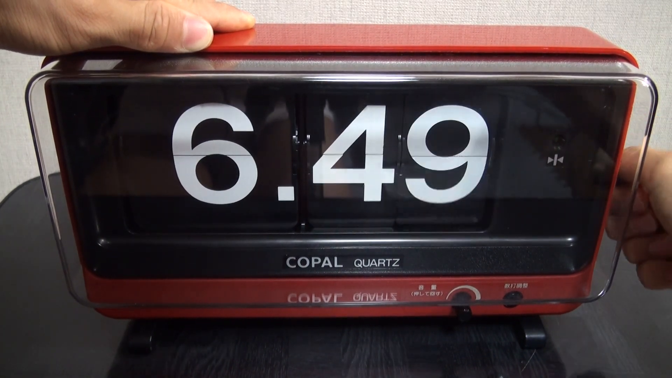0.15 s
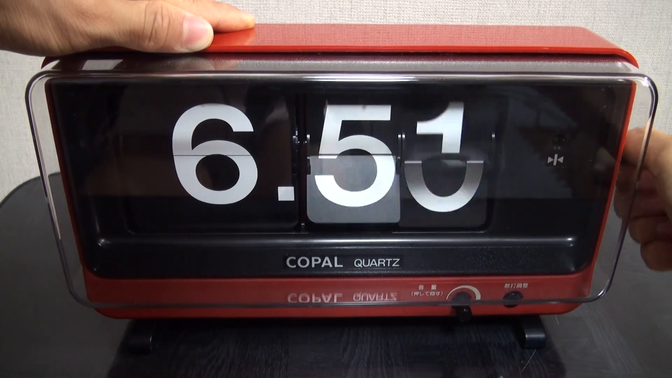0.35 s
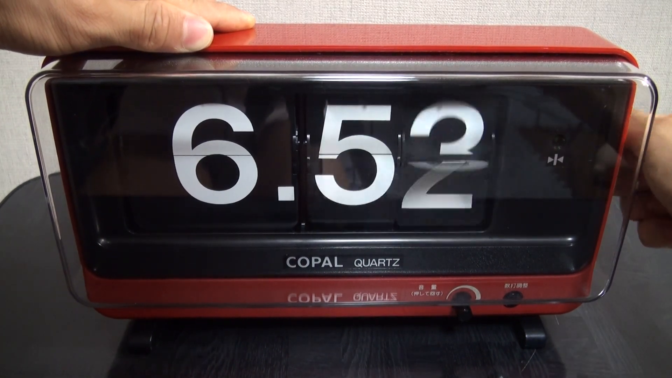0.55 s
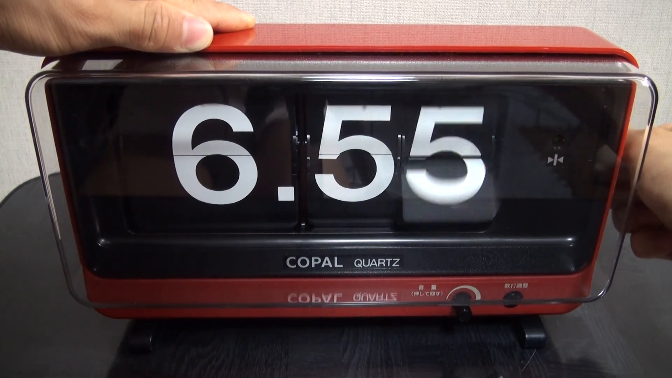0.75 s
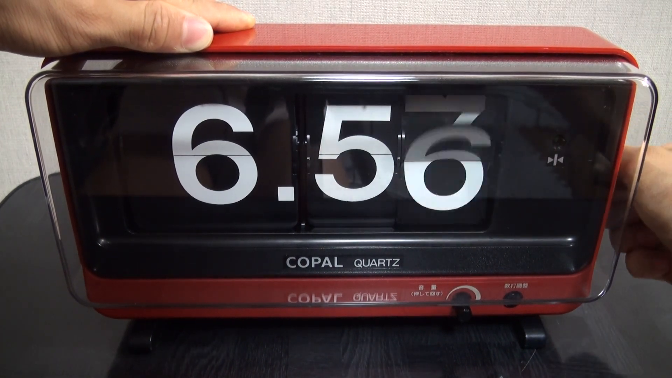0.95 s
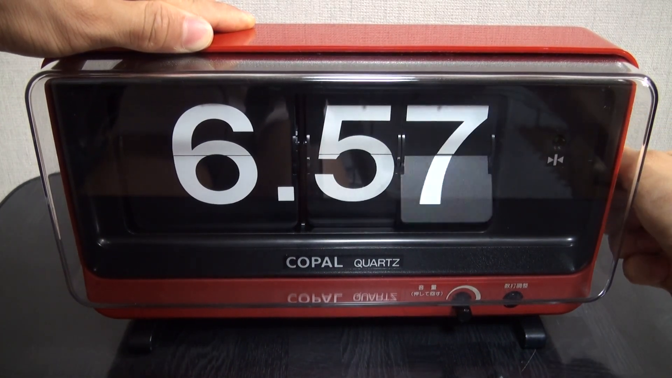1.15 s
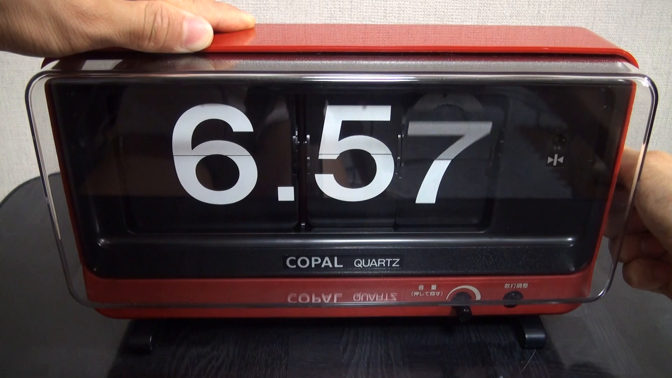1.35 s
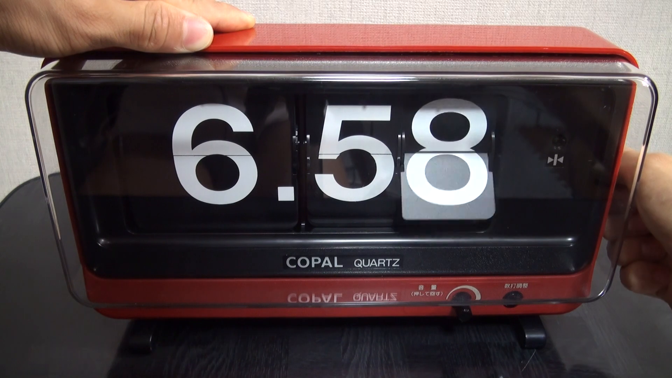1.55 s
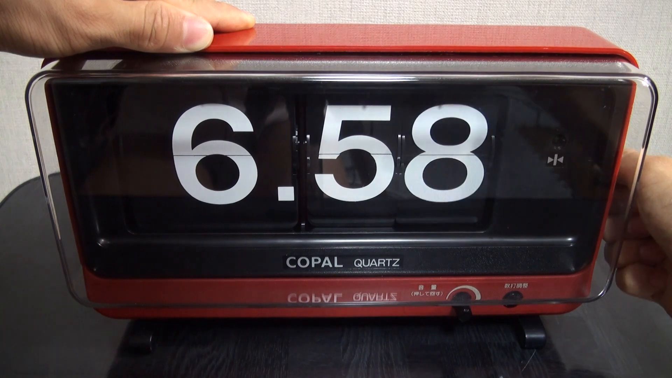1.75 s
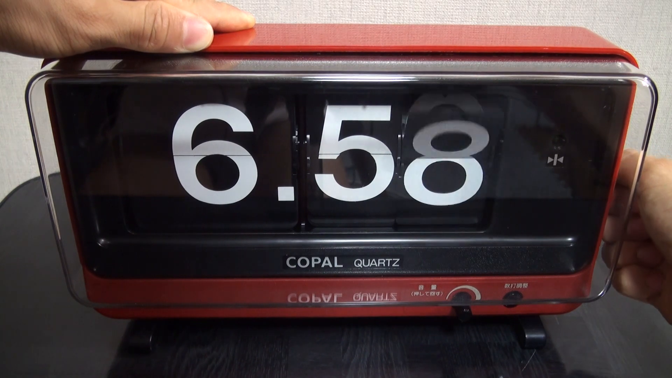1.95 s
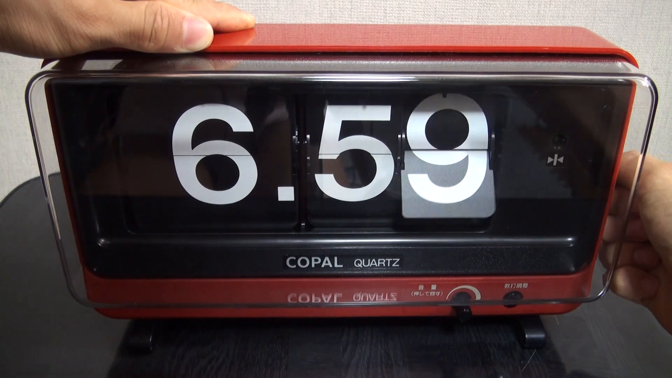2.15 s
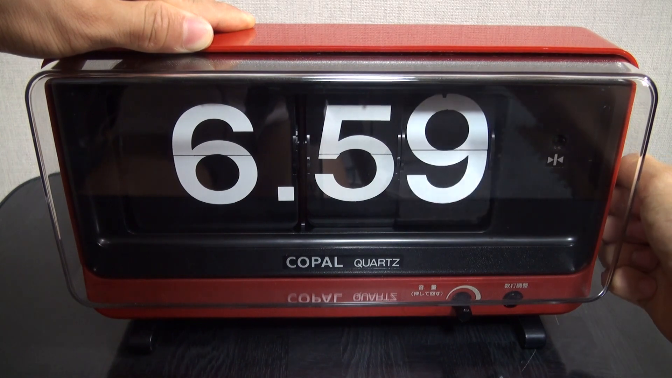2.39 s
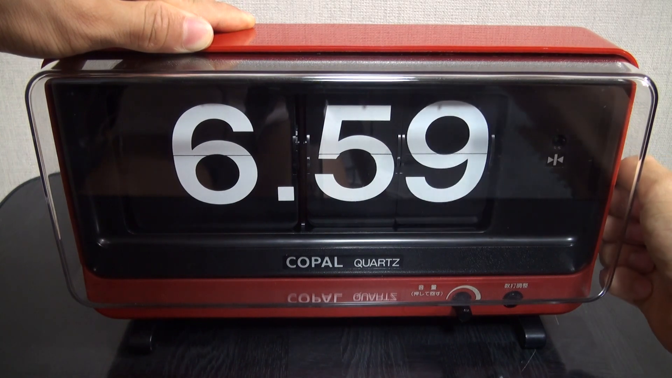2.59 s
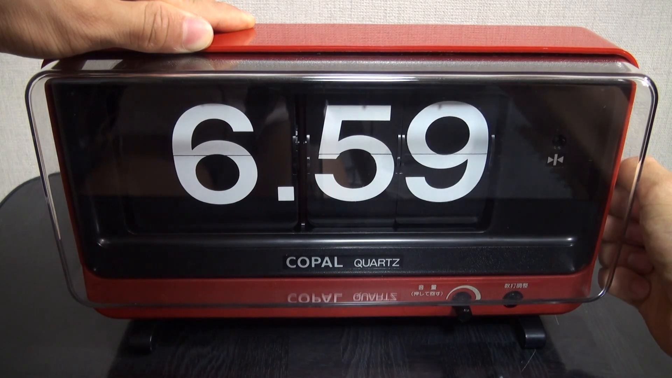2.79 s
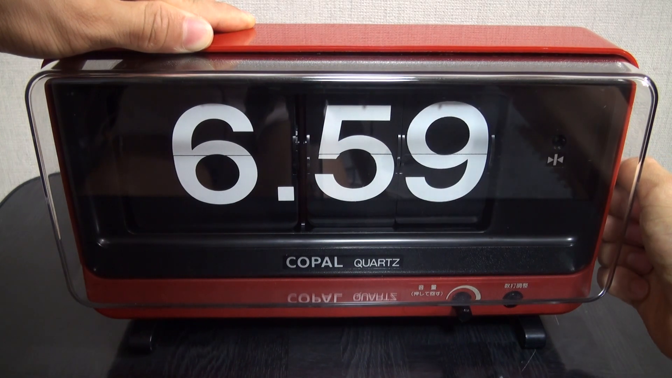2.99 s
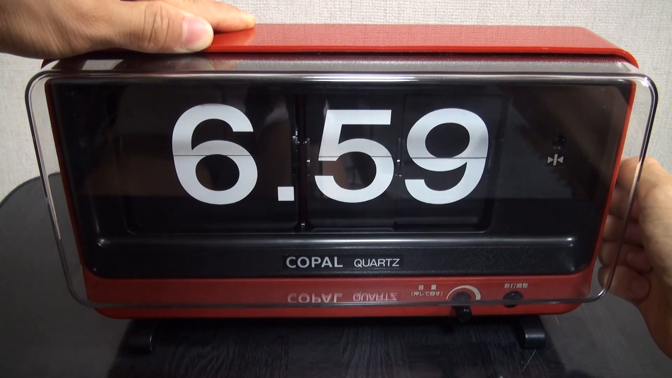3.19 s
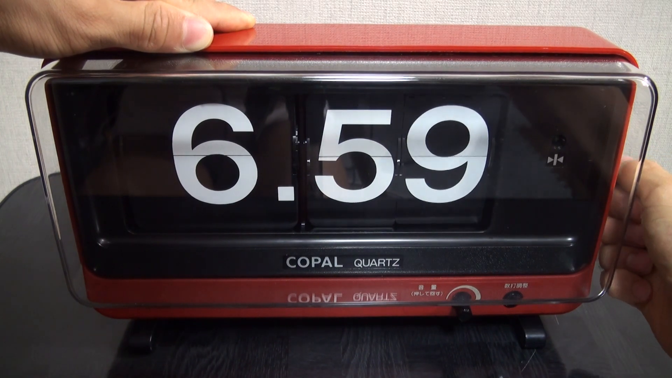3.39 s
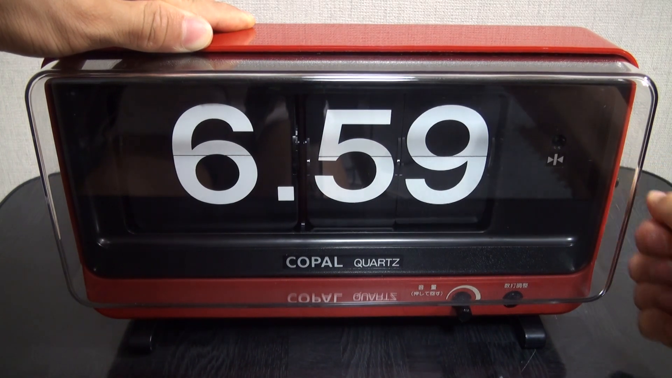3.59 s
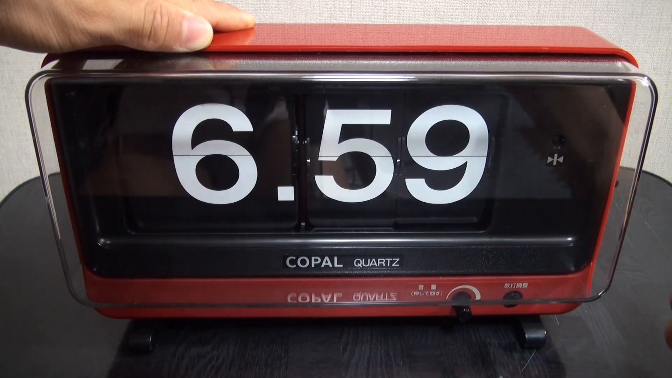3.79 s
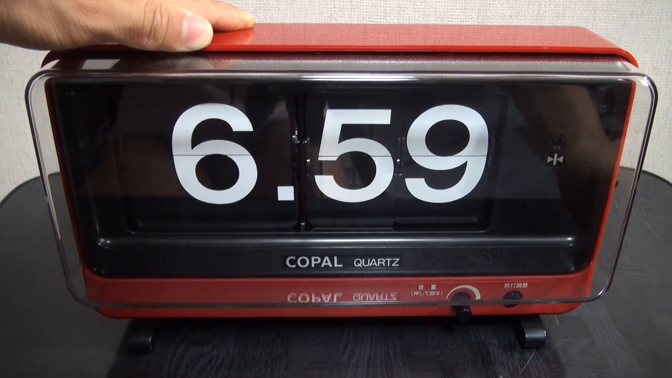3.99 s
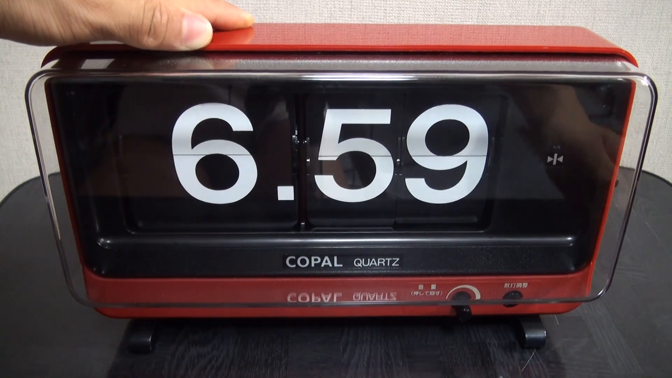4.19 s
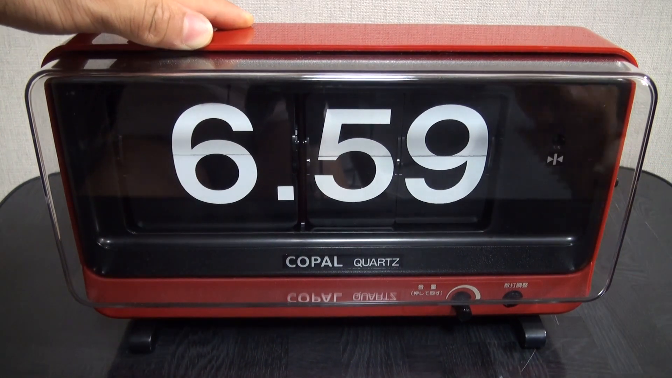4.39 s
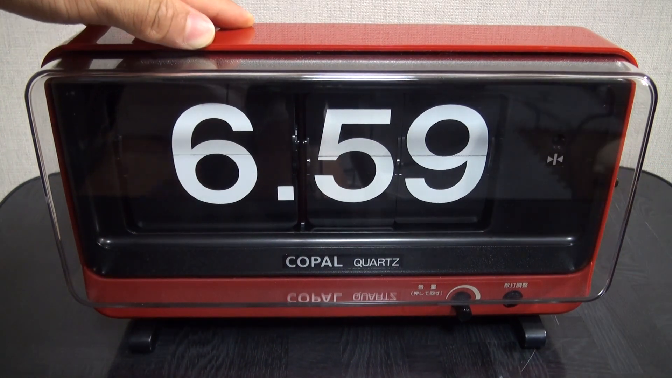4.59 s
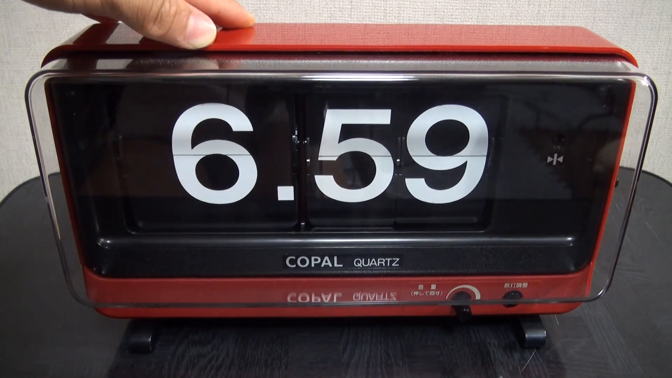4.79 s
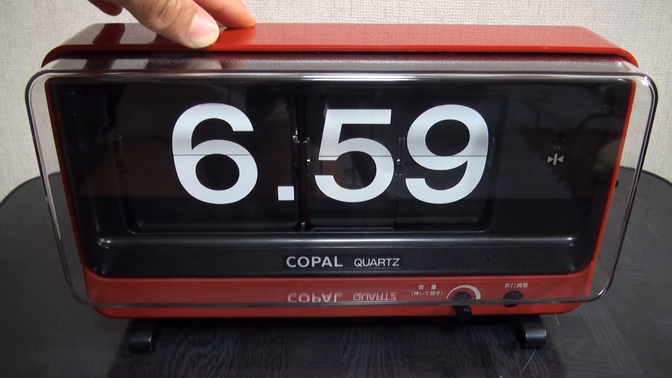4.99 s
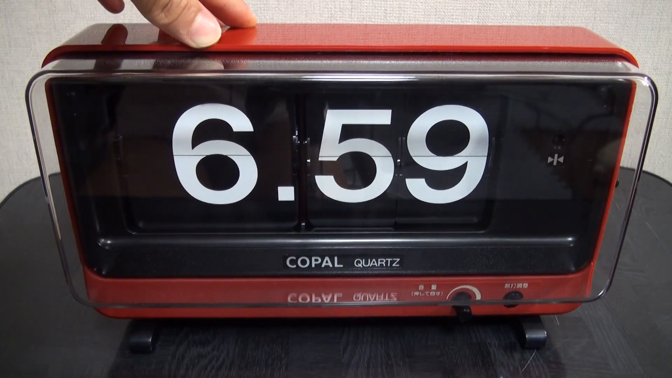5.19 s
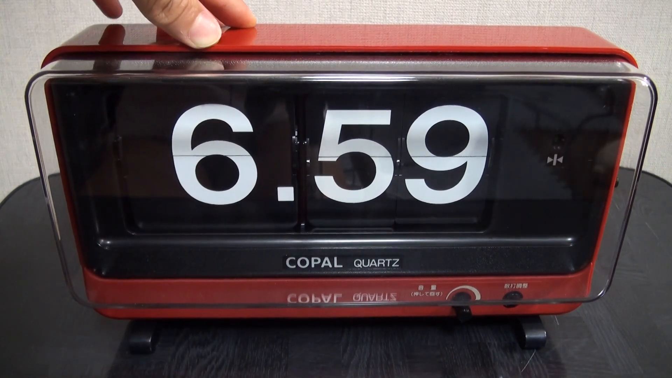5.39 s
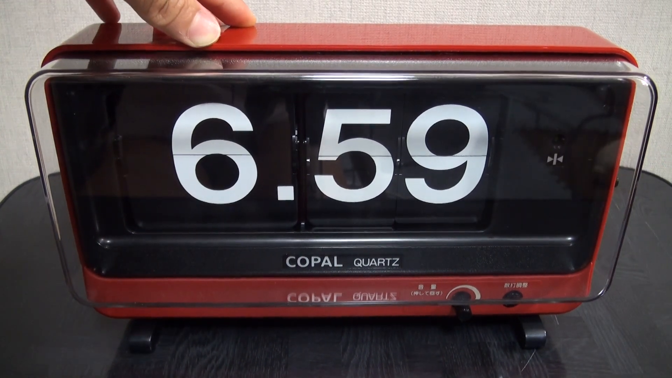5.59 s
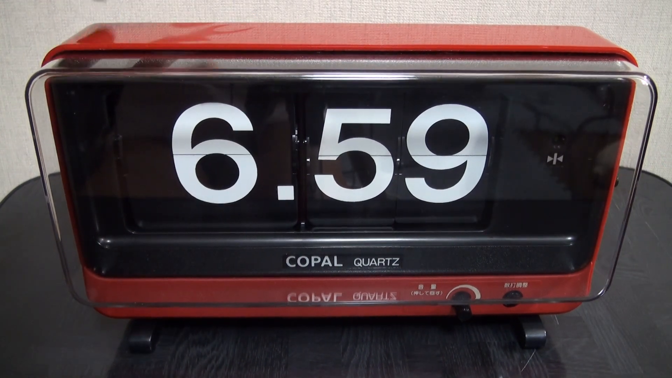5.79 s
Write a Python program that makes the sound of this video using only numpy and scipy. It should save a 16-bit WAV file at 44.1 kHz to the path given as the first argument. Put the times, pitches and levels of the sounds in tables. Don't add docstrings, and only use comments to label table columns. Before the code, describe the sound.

Flip clock cards snap and slap in a fast bright plastic clatter, slow to single flips, then soft finger knocks in a quiet room.

```python
import sys
import numpy as np
from scipy import signal
from scipy.io import wavfile

SR = 44100
rng = np.random.default_rng(int(sys.argv[2]) if len(sys.argv) > 2 else 0)


def put_to_file(sound):
    columns = np.atleast_2d(sound).T
    safe = np.clip(columns, -1, 1)
    whole_steps = np.round(safe * 32767)
    wavfile.write(sys.argv[1], SR, whole_steps.astype(np.int16))


def voltage_ratio(decibels):
    exponent = np.asarray(decibels, float) / 20
    return 10 ** exponent


N = 257965
LEFT_RIGHT = np.array([[1], [-1]])


def contacts():
    # start_s, peak_db, panel_rel_db, case_db, rattle_ms
    snap_events = [(0.0004, -13, -14.5, -35.5, 5.6), (0.2059, -10, -12.5, -31.5, 8.3),
                   (0.3155, -9.5, -14.5, -33, 6.7), (0.418, -14, -10, -33.5, 8.4),
                   (0.519, -10.5, -12, -33.5, 5.5), (0.607, -8.5, -9.5, -37.5, 4.6),
                   (0.6943, -6, -11.5, -36, 4.4), (0.8001, -16.5, -10, -37, 9.4),
                   (0.9383, -8.5, -15.5, -37, 5.8), (1.267, -9.5, -12.5, -34.5, 6.4),
                   (1.8142, -8.5, -11.5, -34, 5.55), (3.1681, -6, -15.5, -34, 4.6)]
    # start_s, peak_db, panel_rel_db, rattle_ms
    slap_events = [(0.0408, -9, -22.5, 2.9), (0.0455, -13.5, -11.5, 3.6), (0.352, -11.5, -9, 2.2),
                   (0.357, -11.5, -18, 3.1), (0.4606, -11, -9.5, 2.2), (0.4644, -7.5, -17, 2.26),
                   (0.5595, -12.5, -13, 4.3), (0.565, -12.5, -21, 3.9), (0.6588, -11, -10, 4.2),
                   (0.727, -15.5, -15, 4.2), (0.738, -9.5, -14.5, 3.3), (0.834, -9, -13.5, 3.4),
                   (0.8999, -23, -9, 2.9), (0.9287, -10, -10, 1.9), (1.246, -20.5, -10.5, 2.5)]
    # start_s, peak_db, panel_rel_db
    tick_events = [
        (1.06, -33.5, -3.5),
        (1.108, -34.5, 3.5),
        (1.1554, -43, -12),
        (1.526, -43, -10),
        (3.939, -41, -4),
        (5.732, -28, 1),
        (5.7526, -25.5, -17),
        (5.766, -26.5, -2),
    ]
    # start_s, peak_db, panel_rel_db, case_rel_db
    knock_events = [(1.1406, -35.5, -1.5, -4.5), (1.2135, -47, -1, -3), (1.3874, -38, -3, -13),
                    (1.511, -43, -16, -8), (1.6573, -39.5, -5, -9), (1.803, -29, -13, -15),
                    (2.079, -42.5, 0, -7), (2.1082, -43.5, -12, 8.5), (2.1394, -46, 11, -19),
                    (2.248, -52, -12, -3), (2.3647, -44, -5, -12), (3.091, -52.5, -4, 5),
                    (3.3683, -52.5, 7, 5), (3.4164, -53, 8, 24.5), (3.9938, -18, -12.5, -18),
                    (4.227, -47, 4.5, 6), (5.6506, -11.5, -11, -19), (5.659, -30, -21, -15),
                    (5.7167, -30.5, -6, -5.5)]
    snaps = [(s, db, panel, case_db - db, ms, 1.8) for s, db, panel, case_db, ms in snap_events]
    slaps = [(s, db, panel, -43 - db, ms, 2.4) for s, db, panel, ms in slap_events]
    ticks = [(s, db, panel, -10, 2.1, 3) for s, db, panel in tick_events]
    knocks = [(*row, 2.86, 2.5) for row in knock_events]
    return snaps, slaps + ticks, knocks


def cards():
    # freq_hz, density_db (per Hz)
    snap_colour = [(1470, -16), (2500, 2), (3040, -4.5), (4410, -7), (4810, -8), (5460, -3.5), (6750, -4.5),
                   (8970, -5), (11100, -6.5), (14300, 0.5), (15800, -8), (16500, -34)]
    # freq_hz, level_db, t60_s
    snap_modes = [(6030, -25.5, 0.072), (9940, -5, 0.0088), (12110, 0, 0.011), (13920, -23, 0.019)]
    # freq_hz, density_db (per Hz)
    slap_colour = [(1470, -49), (2500, -7.5), (3540, -5.5), (3890, -10.5), (4590, -6.5), (7540, -3.5),
                   (8360, -5.5), (10800, -5), (12100, -11), (15100, -20), (16100, -37), (16500, -47)]
    # freq_hz, level_db, t60_s
    slap_modes = [(5090, -9.5, 0.038), (7130, -8, 0.017), (8280, 0, 0.0063), (8610, -3.5, 0.008)]
    snaps, slaps, _ = contacts()
    spread_db, grains_per_s = 3.5, 4500
    snap_push = rattles(snaps, 1, rise_ms=1.0, stretch=0.54)
    slap_push = rattles(slaps, 1, rise_ms=0.96, stretch=0.86)
    snap = sound(snap_push, snap_colour, snap_modes, -6.47, -9.0, spread_db, grains_per_s)
    slap = sound(slap_push, slap_colour, slap_modes, -9.0, -6.5, spread_db, grains_per_s)
    return snap + voltage_ratio(-0.5) * slap + shivers()


def shivers():
    # start_s, level_db, lowest_band_hz
    shiver_events = [
        (0.2058, -37, 4700),
        (0.94, -38.5, 5460),
        (1.268, -36, 5370),
        (1.815, -39, 4320),
        (3.169, -37.5, 5600),
    ]
    # multiple_of_lowest, width_hz, level_db
    shiver_bands = [(1.0, 500, -5), (1.65, 600, -4.5), (2.25, 700, -4.5), (2.6, 800, -12)]
    out = np.zeros((2, N))
    t = np.arange(SR // 2) / SR
    for s, db, low_hz in shiver_events:
        fade = voltage_ratio(db - 60 * t / 0.28) * (1 - np.exp(-t / 0.0011))
        drive = pair(*rng.standard_normal((2, len(t))), 0.79) * fade
        i = round(s * SR)
        for multiple, width_hz, band_db in shiver_bands:
            t60 = np.log(1000) / (np.pi * max(width_hz, 380))
            out[:, i:i + len(t)] += voltage_ratio(band_db) * ring(drive, low_hz * multiple, t60)
    return out


def hollow_case(slips):
    # freq_hz, density_db (per Hz)
    panel_colour = [(440, -49), (750, -2.5), (911, -3), (992, -5.5), (1090, 1), (1600, -0.5), (1840, 0.5),
                    (3200, -9), (4160, -10), (7040, -120)]
    # freq_hz, level_db, t60_s
    panel_modes = [(919, -5, 0.11), (1275, -7, 0.082), (1726, -6, 0.019), (1852, -3.5, 0.055),
                   (2164, -5.5, 0.087), (2595, -4, 0.021)]
    # freq_hz, density_db (per Hz)
    case_colour = [(65, -47), (110, -8), (189, 3), (216, -4.5), (280, -4), (323, 0), (509, 6.5), (646, -1),
                   (850, -15.5), (1100, 11), (1870, -120)]
    # freq_hz, level_db, t60_s
    case_modes = [(166, -39, 0.45), (215.9, -1, 0.4), (270, 0.5, 0.17), (376.4, 0.5, 0.18),
                  (500, 7.5, 0.029), (559, -1, 0.14)]
    every = sum(contacts(), [])
    panel_push = voltage_ratio(-2.5) * rattles(every, 2, rise_ms=0.69, stretch=1.29)
    panel_push = panel_push + voltage_ratio(-4.5) * rubbing(0.65, slips) + voltage_ratio(-7.5) * knob_push()
    panel = sound(panel_push, panel_colour, panel_modes, -4.0, -4.5, 3.7, 2700.0)
    case_push = rattles(every, 3, rise_ms=1.85, stretch=1.89)
    case_push = case_push + voltage_ratio(-9.0) * rubbing(0.62, np.sqrt(slips))
    hollow = sound(case_push, case_colour, case_modes, -3.5, -4.0, 3.7, 1500.0)
    return panel + hollow


def fingers(slips):
    # freq_hz, density_db (per Hz)
    touch_colour = [(1470, -22), (2500, -1), (4140, -2.5), (4550, -1.5), (4970, -4), (11500, -13.5),
                    (14600, -42), (16500, -45)]
    # freq_hz, level_db, t60_s
    touch_modes = [(2697, 0, 0.023), (5600, -5, 0.015)]
    # freq_hz, density_db (per Hz)
    skin_colour = [(1470, -26), (2500, 7), (3710, -27), (5500, -6.5), (6290, -9), (7140, -3), (12200, -15),
                   (15500, -28), (16500, -44)]
    # freq_hz, level_db, t60_s
    skin_modes = [(7220, 0, 0.024)]
    *_, knock_rows = contacts()
    push = rattles(knock_rows, 1, rise_ms=0.11, stretch=0.72) + voltage_ratio(-14.5) * knob_push()
    knocks = sound(push, touch_colour, touch_modes, -10.5, -9.0, 2.3, 8400.0)
    skin = sound(rubbing(0.96, slips), skin_colour, skin_modes, -2.5, -4.0, 6.2, 1300.0)
    return voltage_ratio(-3.5) * knocks + voltage_ratio(-7.5) * skin + knob_ring()


def rubbing(follows, slips):
    # grip_s, pressure_db, slide_s
    rubs = [(0.24, -43.5, 0.31), (0.48, -48.5, 0.5), (0.759, -49.5, 0.21), (1.075, -41.5, 0.073),
            (1.483, -50, 0.021), (1.524, -38.5, 0.023), (1.67, -67, 0.014), (1.99, -60, 0.13),
            (2.113, -41, 0.031), (2.2, -60, 0.03), (2.249, -49, 0.013), (2.372, -64, 0.02),
            (2.56, -66.5, 0.067)]
    middle_db = -44
    strokes = 0
    for s, db, slide_s in rubs:
        pressure_db = middle_db + follows * (db - middle_db)
        strokes = strokes + stroke(s, pressure_db, 0.032, slide_s, follows * 13, follows * 250)
    return slips * strokes * np.ones((2, 1))


def knob_push():
    # start_s, hollow_ring_db, hold_s
    knob = (3.431, -27, 0.012)
    s, db, hold_s = knob
    return stroke(s, db, 0.014, hold_s, 8.0, 1000.0)


def knob_ring():
    hollow_hz = 567
    tone = np.sin(2 * np.pi * hollow_hz * np.arange(N) / SR)
    drive = 0.078 * tone + 0.32 * rng.standard_normal(N)
    return ring(knob_push() * drive, hollow_hz, 0.045)


def table():
    # start_s, level_db
    sway = [
        (0.005, -55),
        (0.23, -43),
        (0.35, -40),
        (0.43, -58),
        (0.6, -36),
        (0.72, -35.5),
        (0.826, -35.5),
        (0.957, -40.5),
        (5.653, -40.5),
        (5.734, -44),
    ]
    # freq_hz, level_db, t60_s
    table_modes = [(165.3, 0, 0.38), (219.2, 6, 0.14), (287.5, 4, 0.14)]
    push = sum(stroke(s, db, 0.027, 0.005, 0, 236) for s, db in sway)
    modes = 0
    for hz, db, t60 in table_modes:
        modes = modes + voltage_ratio(db) * ring(push * rng.standard_normal(N), hz, t60)
    return voltage_ratio(-9.0) * modes


def air():
    # freq_hz, density_db (per Hz)
    air_colour = [(12, -33), (20, -6.5), (53, -5.5), (124, -5.5), (164, -15.5), (206, -5.5), (244, -2.5),
                  (273, -2), (323, -9), (361, -12.5), (506, -13.5), (566, -14.5), (2120, -20),
                  (15100, -33.5), (16500, -31)]
    # freq_hz, left_right_likeness
    air_likeness = [(60, 0.22), (180, 0.85), (550, 0.48), (1650, 0.0075), (4970, 0.065), (15000, 0.75)]
    # time_s, level_db
    stir = [
        (0.0, -35.5),
        (0.26, -54.5),
        (0.41, -74.5),
        (0.63, -51.5),
        (1.24, -47.5),
        (1.97, -52),
        (5.03, -53.5),
        (5.65, -55),
        (5.85, -51),
    ]
    white = rng.standard_normal((2, 2, N + SR))
    s, db = np.transpose(stir)
    stir_db = np.interp(np.arange(N) / SR, s, db - db[-2])
    out = 0
    for k, hz, gain, sos in bank(air_colour):
        mid, side = signal.sosfilt(sos, white[k % 2])[:, SR:]
        share = np.exp(-(np.log(hz / 1560.0) / 2.14) ** 2)
        out = out + gain * voltage_ratio(share * stir_db) * pair(mid, side, at_hz(air_likeness, hz))
    return voltage_ratio(-52.5) * unit(out)


def sound(push, spectrum, modes, tail_db, modes_db, spread_db, per_s):
    # freq_hz, t60_s
    tail_t60 = [(150, 0.6), (400, 0.26), (1040, 0.24), (2760, 0.18), (7280, 0.17)]
    # freq_hz, left_right_likeness
    likeness = [(200, .99), (500, .97), (1200, .9), (4000, .93), (9000, .88), (13000, .3)]
    # freq_hz, left_minus_right_db
    lean = [(60, -2), (180, -15.5), (550, -6), (1650, 0.5), (4970, -2), (15000, -3.5)]
    clicks = grains(spread_db, per_s)
    white = rng.standard_normal((2, 2, N))
    mono_push = np.sqrt(np.mean(push ** 2, axis=0))
    chatter = lumps(350, 1.5)
    out, power = 0, 0
    for k, hz, gain, sos in bank(spectrum):
        r = voltage_ratio(-120 / (at_hz(tail_t60, hz) * SR))
        tail = np.sqrt(signal.lfilter([0, 1 - r], [1, -r], push ** 2)) * voltage_ratio(tail_db) * chatter
        alike = at_hz(likeness, hz)
        drive = push * pair(*clicks, alike) + tail * pair(*white[k % 2], alike)
        balance = voltage_ratio(at_hz(lean, hz) / 2 * LEFT_RIGHT)
        out = out + gain * signal.sosfilt(sos, drive) * balance
        power += gain ** 2 * hz * 0.35 / SR
    rings = 0
    for k, (hz, db, t60) in enumerate(modes):
        rings = rings + voltage_ratio(db) * ring(mono_push * np.roll(clicks[0], 997 * k), hz, t60)
    return out / np.sqrt(power) + voltage_ratio(modes_db) * rings


def rattles(events, column, rise_ms, stretch):
    out = np.zeros((2, N))
    t_ms = np.arange(SR // 10) / SR * 1000
    for row in events:
        start_s, peak_db, rattle_ms, l_r_db = row[0], row[1], row[4], row[5]
        shape = (1 - np.exp(-t_ms / rise_ms)) * np.exp(-t_ms / (max(rattle_ms, 0.5) * stretch))
        relative_db = row[column] if column > 1 else 0
        db = peak_db + relative_db + l_r_db / 2 * LEFT_RIGHT
        i = round(start_s * SR)
        out[:, i:i + len(t_ms)] += (voltage_ratio(db) * shape)[:, :N - i]
    return out


def stroke(s, db, rise_s, hold_s, loss_db, db_per_s):
    t = np.arange(N) / SR - s
    held = np.clip(t / max(hold_s, 1e-3), 0, 1)
    swell = np.clip(1 + t / rise_s, 0, 1) ** 2
    return swell * voltage_ratio(db - loss_db * held - db_per_s * np.maximum(t - hold_s, 0))


def grains(spread_db, per_s):
    sizes = voltage_ratio(spread_db * np.minimum(rng.exponential(1, (2, N)), 4))
    signs = rng.choice([-1, 1], (2, N))
    return unit(sizes * signs * (rng.random((2, N)) < per_s / SR)) + 1e-9


def lumps(per_s, spread_db):
    steps = rng.standard_normal(int(N / SR * per_s) + 2)
    place = np.arange(N) / SR * per_s
    return unit(voltage_ratio(spread_db * (steps[place.astype(int)] - place % 1)))


def ring(x, hz, t60):
    r, w = voltage_ratio(-60 / (t60 * SR)), 2 * np.pi * hz / SR
    return signal.lfilter([0, np.sin(w) * np.sqrt(2 - 2 * r * r)], [1, -2 * r * np.cos(w), r * r], x)


def bank(spectrum):
    edges_hz = 20 * 2 ** np.arange(0, 9.76, 1 / 4)
    for k, (low, high) in enumerate(zip(edges_hz, edges_hz[1:])):
        hz = np.sqrt(low * high)
        if spectrum[0][0] <= hz <= spectrum[-1][0]:
            sos = signal.butter(2, [low, high], "band", fs=SR, output="sos")
            yield k, hz, voltage_ratio(at_hz(spectrum, hz)), sos


def pair(mid, side, alike):
    alike = np.clip(alike, 0, 1)
    return np.sqrt(1 + alike) * mid + np.sqrt(1 - alike) * side * LEFT_RIGHT


def at_hz(points, hz):
    table_hz, values = np.transpose(points)
    return np.interp(np.log(hz), np.log(table_hz), values)


def unit(x):
    return x / np.sqrt(np.mean(x ** 2) + 1e-20)


def scene():
    slips = lumps(90, 3.5)
    clock = cards() + hollow_case(slips) + fingers(slips) + table()
    return signal.sosfilt(signal.butter(4, 120, "high", fs=SR, output="sos"), clock) + air()


def roll_off(x):
    return signal.sosfilt(signal.butter(12, 16620, fs=SR, output="sos"), x)


def record(dry):
    side = signal.sosfilt(signal.butter(2, 450, "high", fs=SR, output="sos"), (dry[0] - dry[1]) / 2)
    wet = dry.mean(axis=0) + side * LEFT_RIGHT
    wet = signal.sosfilt(signal.cheby2(10, 40, 16400, fs=SR, output="sos"), wet)
    mix = 0.72 * np.tanh(wet / 0.71)
    return roll_off(mix)


dry = scene()
out = record(dry)
put_to_file(out)
```